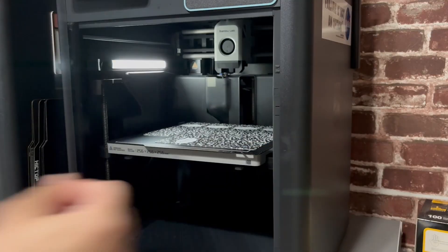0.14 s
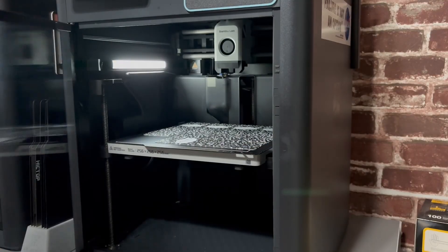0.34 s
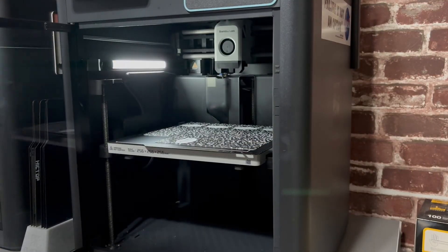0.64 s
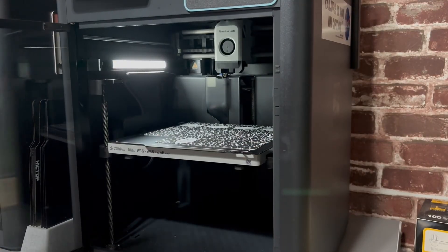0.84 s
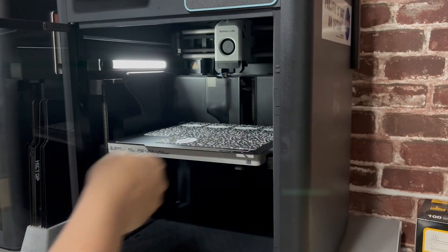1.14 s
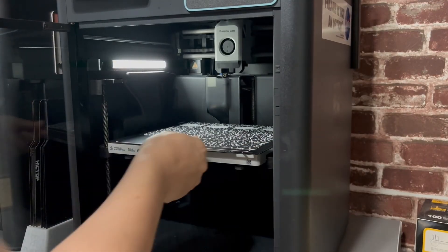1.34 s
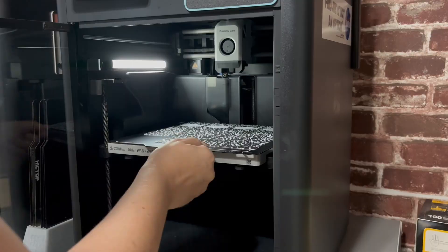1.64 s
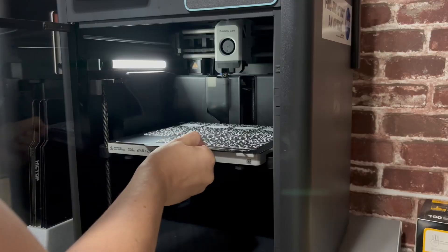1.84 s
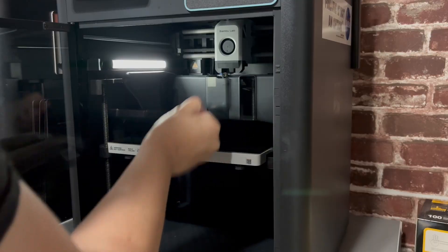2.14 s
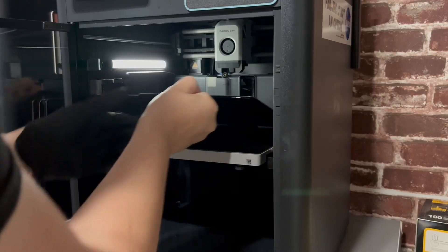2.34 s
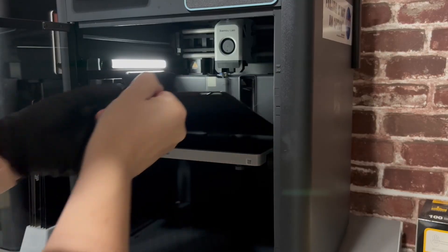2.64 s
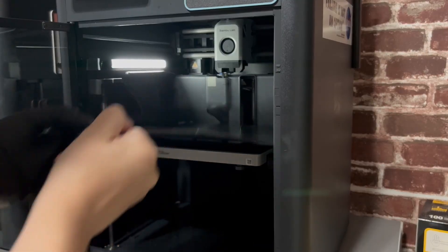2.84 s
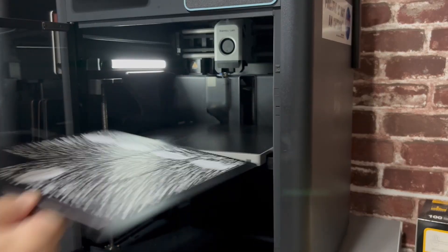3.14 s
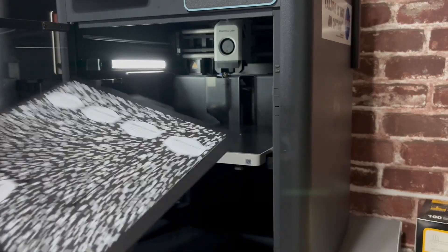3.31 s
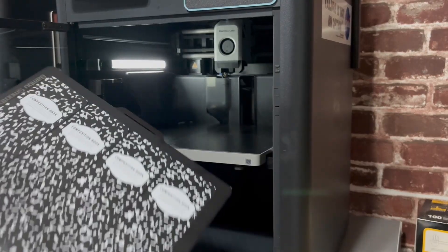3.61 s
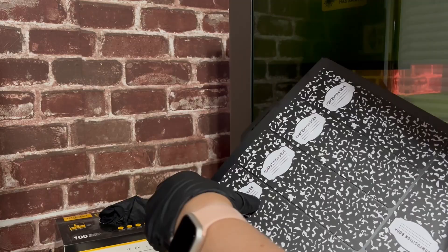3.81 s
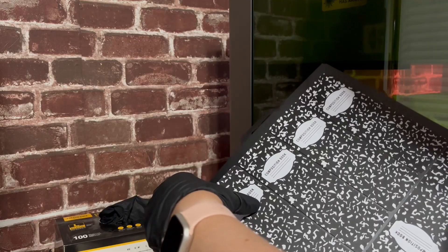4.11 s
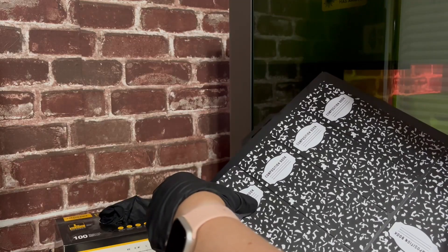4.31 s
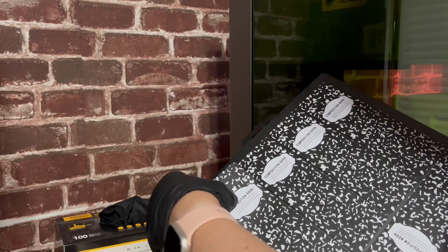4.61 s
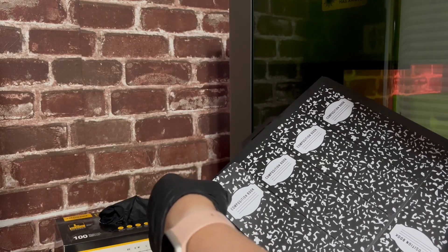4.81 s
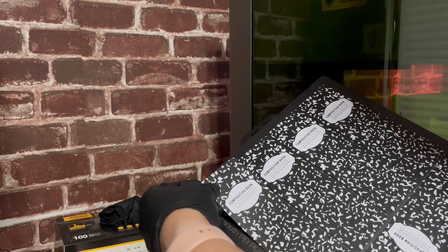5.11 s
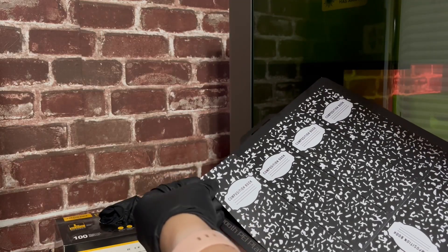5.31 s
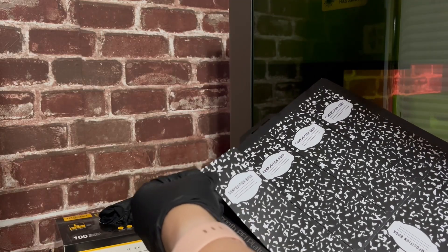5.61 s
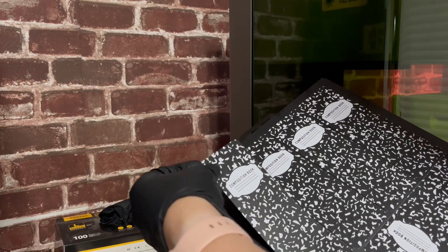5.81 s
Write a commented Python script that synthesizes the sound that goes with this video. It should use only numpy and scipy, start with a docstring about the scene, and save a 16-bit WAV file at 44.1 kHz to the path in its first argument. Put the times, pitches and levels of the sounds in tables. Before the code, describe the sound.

A 3D printer's fans hum softly and steadily in a small room. Its glass door swings open and knocks with a slight rattle. Close by, a steel sheet pops off the bed with a low wobble and slides out with faint squeaks. Then, heard from another spot where the fans sound duller, gloved fingers rub and flex the sheet in short, growing rasps until a plastic piece comes loose with a sharp crack.

```python
"""A desktop 3D printer idles in a small room, fans humming. Its glass door swings open and knocks on
its stop (0.8 s). The steel build sheet wobbles off the magnetic bed (2.1 s) and slides out with
stick-slip squeaks. From 3.84 s, heard from a second spot in the room, gloved fingers rub and flex
the sheet until a printed piece cracks loose (5.9 s)."""
import sys
import numpy as np
from scipy import signal
from scipy.fft import rfft, irfft
from scipy.io import wavfile

SR = 44100
rng = np.random.default_rng(int(sys.argv[2]) if len(sys.argv) > 2 else 0)


def dump(signal):
    """Clip the signal to [-1, 1] and save it as 16-bit WAV at the path in sys.argv[1]."""
    limited = np.clip(np.atleast_2d(signal).T, -1, 1)
    pcm = np.round(limited * 32767).astype(np.int16)
    wavfile.write(sys.argv[1], SR, pcm)


N = 262395
MOVE_S = 3.84   # listener moves from the near spot to the far one


def from_db(db):
    return 10 ** (np.asarray(db) / 20)


def unit_rms(x):
    return x / np.sqrt(np.mean(x ** 2) + 1e-20)


def since(s):
    """Seconds since s, negative before."""
    return np.arange(N) / SR - s


def curves(rows):
    """Breakpoint columns interpolated to every sample."""
    s, *columns = np.transpose(rows)
    return [np.interp(since(0), s, column) for column in columns]


def swell_db(s, hold, rise, fall):
    """Envelope per ms: 0 dB from s for hold; rise and fall in s per 20 dB, at least 0.03."""
    t = np.arange(0, N / SR, .001) - s
    return 20 * np.minimum(t, 0) / max(rise, .03) - 20 * np.maximum(t - hold, 0) / max(fall, .03)


def per_sample(per_ms):
    return np.interp(since(0) * 1000, np.arange(len(per_ms)), per_ms)


def coloured(spectrum):
    """Steady noise of the given spectral shape, rms 1."""
    hz, db = np.transpose(spectrum)
    bins_hz = np.maximum(np.fft.rfftfreq(N, 1 / SR), 1)
    gain = from_db(np.interp(np.log(bins_hz), np.log(hz), db))
    return unit_rms(irfft(rfft(rng.standard_normal(N)) * gain, N))


def drift(rate_hz):
    """Low-passed random wander, rms about 1."""
    step = 40
    r = np.exp(-2 * np.pi * rate_hz * step / SR)
    slow = signal.lfilter([1], [1, -2 * r, r * r], rng.standard_normal(N // step + 2002))[2000:]
    return np.interp(np.arange(N) / step, np.arange(len(slow)), unit_rms(slow))


def resonate(x, hz, width_hz):
    """Two-pole resonance, peak gain 1."""
    r = np.exp(-np.pi * width_hz / SR)
    feedback = [1, -2 * r * np.cos(2 * np.pi * hz / SR), r * r]
    return signal.lfilter(np.array([1, 0, -1]) * (1 - r * r) / 2, feedback, x)


def narrow_noise(hz, width_hz):
    """Noise twice through a resonance, rms 1."""
    return unit_rms(resonate(resonate(rng.standard_normal(N), hz, width_hz), hz, width_hz))


# Sleeve, glove and sheet strokes: (time [s], hold [s], relative level [dB], low offset [dB],
# bright offset [dB], top offset [dB], rise [s/20 dB], fall [s/20 dB])
STROKES = [(0.0, 0.11, -77, 3.5, -7, -6, .05, 0.3), (.122, .01, -72, 4, -7, -5, 0.1, 0.15),
           (0.228, .03, -73.5, 0, -10.5, -8, 0.4, 0.26), (0.428, .01, -79, 1, 9, 2, 0.1, 0.4),
           (.53, .01, -63.5, 0.5, -11, -17, 0.18, .12), (0.642, 0.0082, -65.5, -10, -10, -14, 0.13, 0.04),
           (.71, .02, -87, 5, 2, 14, 0.17, .06), (.82, 0.022, -89, 5.5, 6, 15, 0, .04),
           (.96, .03, -89, 5, 4.5, 14, 0.6, 0.14), (1.17, 0.11, -85, 14, -4, 5.5, 0.3, .25),
           (2.103, 0.04, -81, 5.5, -2, 3, .1, .05), (2.202, .01, -63.5, 8, -14, -12, 0.08, 0.05),
           (2.285, 0.0077, -63, 1, -5, -12, 0.08, 1), (2.422, 0.056, -51, 1.5, -3.5, -4.5, .16, 0.29),
           (2.56, .02, -59.5, 5.5, -6, -10, .1, 0.3), (2.67, 0.038, -62, 4.5, -2, -7, 0.12, 0.12),
           (2.83, 0.089, -62.5, 6.5, -3.5, -3.5, 0.08, .1), (2.984, .02, -47.5, -4, -14.5, -17, .1, .13),
           (3.044, 0.027, -53.5, -1, 0.5, -4, 0.1, 0.06), (3.084, 0.019, -58, 7.5, -2.5, -6, 0.12, 0.08),
           (3.29, 0.076, -75, 5.5, 3, 2, 0, 0.25), (3.457, .02, -82, 0, 7, -2, -0.5, -0.1),
           (3.69, 0.086, -75, 1.5, 2, 0, 0.07, .2), (3.873, .02, -79, 13, 2.5, 2, -0.2, .1),
           (4.04, 0.049, -59, 7.5, -0.5, -3.5, .04, 0.1), (4.189, .01, -63.5, 1, -1.5, -2, 0.09, 0.3),
           (4.303, 0.12, -67, 2, -0.5, -1.5, .15, 0.7), (4.436, 0.094, -59, 5.5, 3.5, 2, 0.05, 0.2),
           (4.551, 0.083, -53, 2, 3.5, 4, 0.076, 0.14), (4.659, .02, -49, -1, -2, -0.5, 0.0667, 0.16),
           (4.863, 0.021, -60, 9.5, -8, -3, 0.06, 0), (4.966, 0.0063, -47, 0, -2, 0.5, .07, 0.19),
           (5.161, .14, -62.5, -2, 1, 3, .2, 0), (5.326, 0.064, -43, 1.5, 0.5, 0.5, .045, 0.1),
           (5.538, .05, -58, -8, 1, 0.5, 0.13, .1), (5.6, .11, -49.5, -0.5, -2, -2, .06, 0.3),
           (5.773, .12, -48, -3, -4, -5, 0.07, .05), (5.94, .02, -34, -6, -10, -10, 0.06, .05)]
def stroke_levels():
    """Summed stroke power in dB per ms, in four bands: low, middle, bright, top."""
    power = 1e-14
    for s, hold, db, low_db, bright_db, top_db, rise, fall in STROKES:
        spot_db = [-10, 0, 5.5, 6.5] if s > MOVE_S else [0, 0, -1, 1]
        colour_db = np.add(spot_db, [low_db, 0, bright_db, top_db])
        power = power + from_db(db + colour_db[:, None] + swell_db(s, hold, rise, fall)) ** 2
    return 10 * np.log10(power)


# Low, middle, bright and top stroke bands: (centre [Hz])
BANDS_HZ = [1890, 3980, 8800, 14400]
def rubbing(bands_db, grain_db=1.5, patchy_db=2.0, trim_db=-8.0, low_cut_hz=1450):
    """Friction grains ring in many small hollows of glove and sheet, each coming and going."""
    grains = rng.standard_normal((2, N)) * from_db(grain_db * drift(140))
    out = np.zeros(N)
    for k, hz in enumerate(np.r_[np.geomspace(1300, 5500, 13), np.linspace(6200, 16000, 15)]):
        weights = np.array([np.interp(np.log(hz), np.log(BANDS_HZ), band) for band in np.eye(4)])
        gain = from_db(per_sample(weights @ bands_db) + patchy_db * drift(3.7) + trim_db)
        gain /= np.hypot(1, (low_cut_hz / hz) ** 3)   # small grains radiate little bass
        width_hz = min(0.14 * hz, 700)
        out += gain * unit_rms(resonate(resonate(grains[k % 2], hz, width_hz), hz, 2 * width_hz))
    return out


# Hollow glide: (time [s], pitch [Hz], level re middle stroke band [dB])
HOLLOW_GLIDE = [(3.95, 4490, -53), (4.18, 3890, -2), (4.35, 3500, -10.5), (4.55, 2980, -8.5),
                (4.7, 2616, -10.5), (5.0, 2668, -8.5), (5.3, 2547, -10.5), (5.6, 2205, -22.5),
                (5.9, 2170, -29)]
# Hollow partials: (pitch ratio, relative level [dB])
HOLLOW_PARTIALS = [(.7, -21), (.87, -8.5), (1, 1.5), (1.321, -3.5), (1.62, -5), (2.0, -5), (2.38, -2.5),
                   (2.63, -2), (3.03, -2)]
def hand_hollow(middle_db, width_hz=135, flutter_db=3.5):
    """The hollow between hand and sheet sings in noise bands, sinking as the grip shifts."""
    hz, hollow_db = curves(HOLLOW_GLIDE)
    phase = 2 * np.pi * np.cumsum(hz) / SR
    level_db = per_sample(middle_db) + hollow_db
    out = np.zeros(N)
    for ratio, db in HOLLOW_PARTIALS:
        band = drift(width_hz) * np.cos(ratio * phase) + drift(width_hz) * np.sin(ratio * phase)
        out += from_db(level_db + db + flutter_db * drift(7)) * band
    return out


# Glove slips: (peak time [s], level [dB], rise from half amplitude [s], fall to half [s])
SLIPS = [(4.553, -37, 0.0036, 0.0053), (4.955, -37.5, 0.0049, 0.024), (5.18, -54, 0.0045, 0.0066),
         (5.329, -36, 0.0032, 0.02), (5.61, -24.5, 0.0079, 0.0047), (5.645, -23.5, 0.0052, 0.006),
         (5.672, -26.5, 0.007, 0.0073), (5.746, -25.5, 0.0075, 0.01), (5.911, -27.5, 0.0034, 0.0085)]
# Rasp spectrum: (frequency [Hz], relative density [dB])
SLIP_SPECTRUM = [(590, -40), (1000, -21), (1570, -21), (1960, -7), (2710, -11.5), (3710, 1.5), (5310, -9),
                 (7440, 2), (8650, -1.5), (15100, -0.5), (16000, 0.5)]
def glove_slips(grain_db=-0.5):
    """The glove slips on the flexed sheet in short rasps."""
    envelope = np.zeros(N)
    for s, db, rise, fall in SLIPS:
        t = since(s)
        envelope += from_db(db) / (1 + (t / np.where(t < 0, rise, fall)) ** 2)
    return envelope * coloured(SLIP_SPECTRUM) * from_db(grain_db * drift(511))


# Plastic snaps: (time [s], level [dB], t60 [s], centre [Hz], width [Hz])
SNAPS = [(0.153, -62, 0.016, 1200, 1200), (3.8494, -47.5, 0.029, 6140, 12100),
         (3.903, -62, .02, 6000, 9000), (4.0065, -49.5, 0.031, 7100, 7000),
         (4.0327, -36, 0.057, 10900, 10100), (4.1083, -52, 0.022, 6000, 8000),
         (4.2363, -53, 0.022, 6000, 8000), (5.93, -22.5, 0.041, 3420, 2000),
         (5.929, -8.5, 0.0074, 13200, 7000), (5.9301, -8, 0.0039, 9000, 14000),
         (5.9332, -18, 0.0042, 10000, 9300), (5.9321, -8, 0.0038, 6040, 5000),
         (5.9345, -17, 0.0069, 8000, 10000), (5.9357, -25, 0.005, 7050, 8000),
         (5.9377, -16, 0.012, 6040, 8000)]
def plastic_snaps():
    """Printed plastic cracks in sharp noise bursts, each with its own colour."""
    out, t = np.zeros(N), np.arange(SR // 10) / SR
    for s, db, t60, hz, width_hz in SNAPS:
        at = round(s * SR)
        crack = unit_rms(resonate(rng.standard_normal(len(t)), hz, width_hz))
        out[at:at + len(t)] += (from_db(db - 60 * t / t60) * crack)[:N - at]
    return out


# Two squeaks, lift then pull, rows of: (time [s], slip rate [Hz], level [dB], second partial [dB])
SQUEAKS = [
    [(2.37, 660, -69, -75), (2.42, 850, -48, -69), (2.48, 1010, -46.5, -58), (2.53, 990, -55, -53),
     (2.58, 920, -57, -56), (2.62, 890, -55, -61), (2.66, 760, -56.5, -63), (2.72, 690, -66, -75)],
    [(2.8, 697, -67, -75), (2.84, 664, -51, -60), (2.9, 493, -54, -72), (2.93, 595, -56, -72),
     (2.96, 718, -44.5, -72), (3.03, 750, -52.5, -70), (3.08, 807, -58, -72), (3.12, 828, -64, -75)],
]
def edge_squeak(rows, jitter=0.0172, flutter_db=4.0, fade_s=0.05):
    """The sheet edge sticks and slips over the bed at a gliding, uneven rate."""
    hz, first_db, second_db = curves(rows)
    phase = 2 * np.pi * np.cumsum(hz * (1 + jitter * drift(82))) / SR
    fade = np.clip(np.minimum(since(rows[0][0]), -since(rows[-1][0])) / fade_s, 0, 1)
    partials_db = [first_db, second_db, second_db - 5, second_db - 8]
    return fade * sum(from_db(db + flutter_db * drift(37)) * np.sin(k * phase)
                      for k, db in enumerate(partials_db, 1))


# Drags: (time [s], hold [s], level [dB], rise [s/20 dB], fall [s/20 dB])
DRAGS = [(2.247, 0.11, -62, 0.3, -0.3), (2.453, 0.032, -54, 0.32, .5), (2.854, 0.011, -55, 0.1, 0.04),
         (2.95, 0.018, -49.5, 0.02, 0.32)]
# Drone spectrum: (frequency [Hz], relative density [dB])
DRAG_SPECTRUM = [(60, -30), (120, -0.5), (300, 0), (500, -1), (1000, -4.5), (1500, -19.5), (2500, -32)]
def sheet_drag():
    """Low friction drone of the sheet sliding over the bed."""
    envelope = sum(from_db(db + swell_db(s, hold, rise, fall)) for s, hold, db, rise, fall in DRAGS)
    return per_sample(envelope) * coloured(DRAG_SPECTRUM)


# Sheet bending modes: (frequency [Hz], peak level [dB], time to peak [s])
BENDING_MODES = [(61, -50, 0.059), (82.6, -49.5, 0.078), (110.7, -41.5, 0.023), (150, -43, 0.02),
                 (232.5, -39.5, 0.0094), (315, -46.5, 0.011), (480, -45, 0.0089), (714, -48.5, 0.015)]
def sheet_wobble(release_s=2.148):
    """The magnets let go; each bending mode swells and fades, the low ones more slowly."""
    t = np.maximum(since(release_s), 0)
    out = np.zeros(N)
    for hz, db, peak_s in BENDING_MODES:
        envelope = from_db(db) * t / peak_s * np.exp(1 - t / peak_s)
        out += envelope * np.sin(2 * np.pi * (hz * t + rng.random()))
    return out


# Knocks: (time [s], door gain [dB], sheet gain [dB], contact [s], crack gain [dB], cutoff [Hz],
# crack decay scale [s])
KNOCKS = [(0.7488, -35.5, -80, 0.0011, -58.5, 7000, 0.35), (.853, -38, -51, 0.0022, -36.5, 15000, 0.13),
          (.865, -39, -80, 0.0013, -39.5, 5000, 0.12), (1.842, -72, -56, 0.00075, -47.5, 3100, .12),
          (2.145, -44.5, -36, 0.00063, -36, 8800, 0.063)]
# Door and frame modes: (frequency [Hz], relative level [dB], t60 [s])
DOOR_MODES = [(556, -3.5, 0.13), (749, 1.5, 0.055), (850, 7.5, 0.036), (930, -14.5, 0.23), (965, -7, 0.025),
              (1150, -18, 0.059), (1615, -28, 0.099), (2150, -36, 0.045)]
# Hand-damped steel sheet modes: (frequency [Hz], relative level [dB], t60 [s])
SHEET_MODES = [(1290, -9.5, .12), (1740, -4, 0.044), (1910, 1.5, 0.019), (2120, -12, .05),
               (2590, -10.5, 0.036), (2810, -11.5, 0.06), (3340, -8, 0.024), (3700, -13, .03)]
# Contact crack spectrum: (frequency [Hz], relative density [dB])
CRACK_SPECTRUM = [(530, -4), (900, -3), (1410, -2.5), (2630, -14), (4570, -16), (5160, -14), (8050, -19.5),
                  (10600, -17), (16000, -19.5)]
def knocks():
    """Door and sheet modes ring after a soft or hard contact; a crack of noise dies away."""
    out, t = np.zeros(N), np.arange(SR) / SR
    for s, door_db, sheet_db, contact_s, crack_db, cutoff_hz, decay_s in KNOCKS:
        blow = np.zeros(SR)
        attack = 1 - np.exp(-t / contact_s)
        for db, modes in ((door_db, DOOR_MODES), (sheet_db, SHEET_MODES)):
            for hz, mode_db, t60 in modes:
                reach = 1 / (1 + (hz / cutoff_hz) ** 4)   # a dull blow misses the high modes
                envelope = attack * from_db(db + mode_db - 60 * t / t60)
                blow += reach * envelope * np.sin(2 * np.pi * hz * t)
        decay = from_db(-240 * t / decay_s) + 0.3 * from_db(-30 * t / decay_s)
        crack = coloured(CRACK_SPECTRUM)[:SR] * decay
        blow += from_db(crack_db) * signal.sosfilt(signal.butter(4, cutoff_hz, fs=SR, output="sos"), crack)
        at = round(s * SR)
        out[at:at + SR] += blow
    return out


# Jolts: (time [s], level [dB], centre [Hz], width [Hz], t60 [s])
JOLTS = [(.87, -58, 5200, 900, 0.28), (1.843, -54, 2500, 350, .04), (2.832, -52.5, 1310, 900, 0.33),
         (4.8, -48.5, 159, 150.4, 0.31), (5.933, -37, 148, 195, 0.3), (5.927, -37.5, 490, 296, 0.1),
         (5.929, -29.5, 1100, 600, 0.036)]
def jolts():
    """Noisy rings: door glass rattles; the sheet is pinged by a nail, catches, flexes, springs back."""
    out, t = np.zeros(N + SR), np.arange(SR) / SR
    for s, db, hz, width_hz, t60 in JOLTS:
        ring = resonate(resonate(rng.standard_normal(2 * SR), hz, width_hz), hz, width_hz)
        at = round(s * SR)
        out[at:at + SR] += from_db(db - 60 * t / t60) * unit_rms(ring[SR:])
    return out[:N]


# Reflections off sheet, arm and wall: (first delay [ms], last delay [ms], gain)
ECHOES = [(.31, .5, 0.15), (.86, 0.632, 0.18), (.98, 1.05, .17), (2.37, 2.38, 0.19)]
def with_echoes(x, glide_start_s=4.29, settle_s=0.52):
    """At the far spot, short reflections comb the sound; their delays move with hand and sheet."""
    samples = np.arange(N)
    remaining = np.exp(-np.maximum(since(glide_start_s), 0) / settle_s)
    echoes = np.zeros(N)
    for first_ms, last_ms, gain in ECHOES:
        delay_ms = last_ms + (first_ms - last_ms) * remaining
        echoes += gain * np.interp(samples - delay_ms * SR / 1000, samples, x)
    return x + echoes * (since(MOVE_S) > 0)


def room_tail(x, t60_s=0.33, level_db=-15.5):
    """Diffuse reverberation: convolution with decaying noise."""
    t = np.arange(int(.4 * SR)) / SR
    tail = rng.standard_normal(len(t)) * from_db(-60 * t / t60_s) * (t > .004)
    return from_db(level_db) * signal.fftconvolve(x, tail / np.linalg.norm(tail))[:N]


# Fan air at each spot: (frequency [Hz], relative density [dB])
AIR_NEAR = [(13, -56), (22, -22.5), (49, -1), (80, -7), (147, -4.5), (179, -7), (337, -11.5), (398, -16),
            (672, -16.5), (1380, -27.5), (1860, -38.5), (3810, -47), (10600, -57.5), (14300, -51),
            (16000, -53)]
AIR_FAR = [(13, -58), (22, -62), (36, -16.5), (59, -6.5), (81, -9.5), (203, -11.5), (276, -16.5),
           (381, -17.5), (456, -21), (641, -22), (1600, -33.5), (2080, -41), (3520, -120)]
# Duct and case resonances: (centre [Hz], width [Hz], near base level [dB], far base level [dB])
DUCTS = [(149.2, 9.4, -66, -74), (345, 39, -70.5, -76), (386.5, 60, -70, -65), (676.4, 89, -65.5, -76),
         (1001, 117, -72, -75.5), (1328, 20, -83.5, -99)]
# Door, arm and sheet shading the opening: (time [s], duct gain [dB])
SHADING = [(0, 2), (.65, 5), (1.5, -1.5), (2.4, 3), (3.6, 2.5), (4.7, 2.5), (5.95, 5.5)]
def fans(air_db=-54.5, crossfade_s=.01):
    """Broad fan air noise that also sings in ducts and case."""
    far = np.clip(since(MOVE_S) / crossfade_s, 0, 1)
    out = from_db(air_db) * (coloured(AIR_NEAR) * (1 - far) + coloured(AIR_FAR) * far)
    shading_db, = curves(SHADING)
    for hz, width_hz, near_db, far_db in DUCTS:
        out += from_db(near_db * (1 - far) + far_db * far + shading_db) * narrow_noise(hz, width_hz)
    return out


# Motor driver tones: (frequency [Hz], rms level [dB])
DRIVER_TONES = [(3752, -95), (3838, -99), (8350, -104), (13986, -102)]
def driver_whine(flutter_db=2.5):
    """The motor drivers whine faintly, wavering in level."""
    return sum(from_db(db + flutter_db * drift(8)) * np.sqrt(2) * np.sin(2 * np.pi * hz * since(0))
               for hz, db in DRIVER_TONES)


# Hum envelope: (time [s], relative level [dB])
HUM_LEVELS = [(0.0, -74), (.4, -63), (.7, -53), (1.0, -56), (1.35, -66), (1.48, -55), (1.75, -70),
              (2.04, -54), (2.14, -56), (2.24, -44), (2.45, -54.5), (3.0, -58), (3.3, -63), (3.73, -60),
              (3.88, -47), (4.01, -44.5), (4.12, -54), (4.45, -52.5), (4.55, -58.5), (4.85, -48),
              (5.12, -55.5), (5.2, -35.5), (5.26, -54), (5.34, -47.5), (5.44, -55), (5.7, -48), (5.88, -55),
              (5.95, -46)]
def room_hum(hz=54.4, width_hz=13.2, trim_db=-1.0):
    """A low wavering room note whose level rises and falls unevenly."""
    hum = narrow_noise(hz, width_hz)
    hum /= np.abs(signal.hilbert(hum)) + 0.3   # evens out its strength
    return from_db(curves(HUM_LEVELS)[0] + trim_db) * unit_rms(hum)


def scene():
    """Mono mix; only the hits feed the room tail."""
    hits = knocks() + plastic_snaps() + with_echoes(glove_slips())
    bands_db = stroke_levels()
    handling = with_echoes(rubbing(bands_db) + hand_hollow(bands_db[1]))
    handling += sum(map(edge_squeak, SQUEAKS)) + sheet_drag() + sheet_wobble() + jolts()
    background = fans() + driver_whine() + room_hum()
    return (handling + hits + room_tail(hits) + background)[None]


def record(dry, low_cut_hz=38.7, stopband_hz=16050):
    """The microphone drops the deepest bass; the top is cut steeply."""
    thin = signal.sosfilt(signal.butter(2, low_cut_hz, "high", fs=SR, output="sos"), dry)
    return signal.sosfilt(signal.cheby2(26, 60, stopband_hz, fs=SR, output="sos"), thin)


dry = scene()
out = record(dry)
dump(out)
```